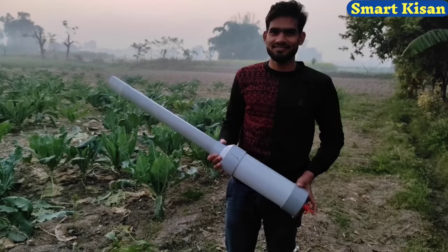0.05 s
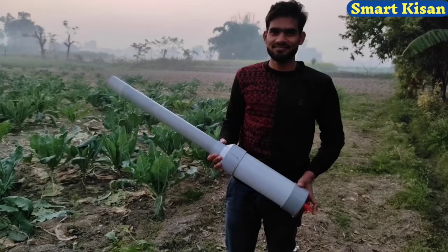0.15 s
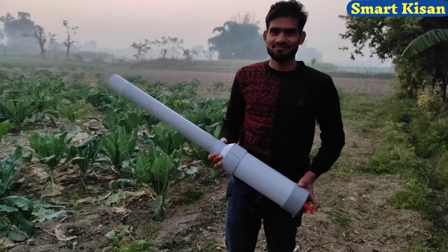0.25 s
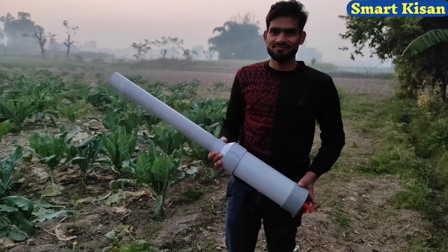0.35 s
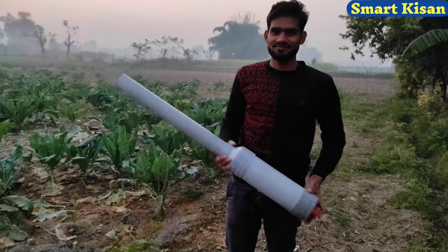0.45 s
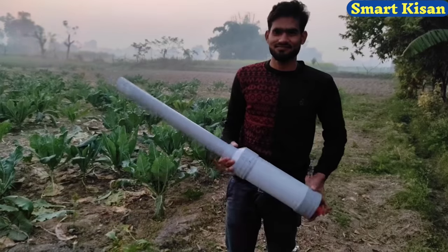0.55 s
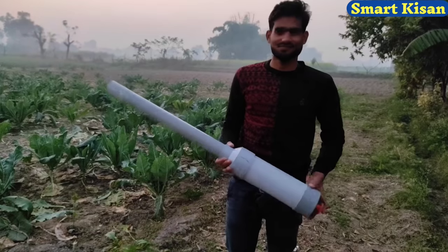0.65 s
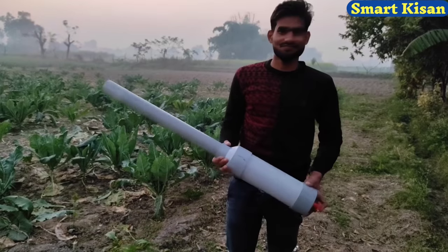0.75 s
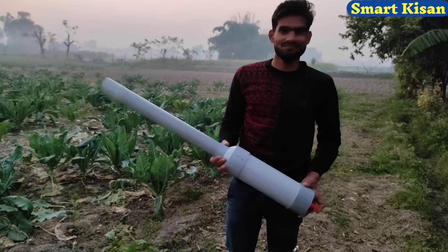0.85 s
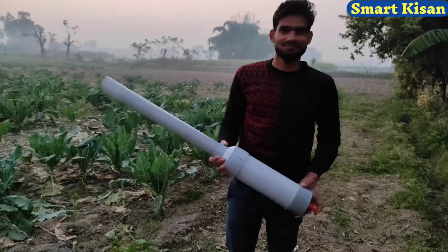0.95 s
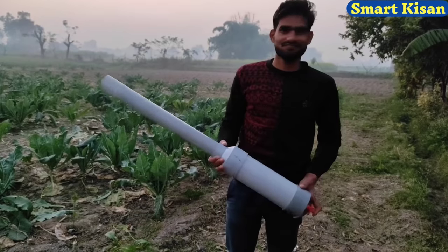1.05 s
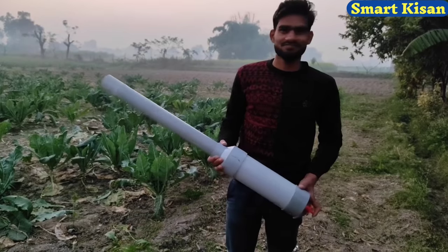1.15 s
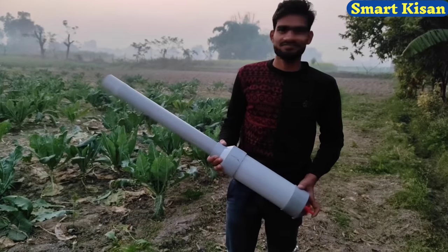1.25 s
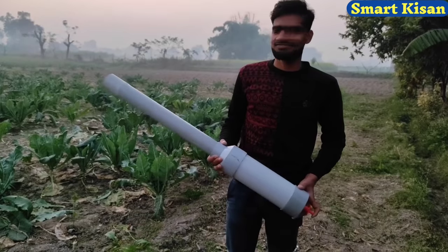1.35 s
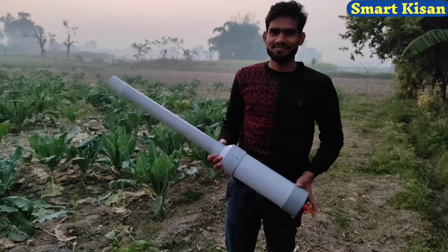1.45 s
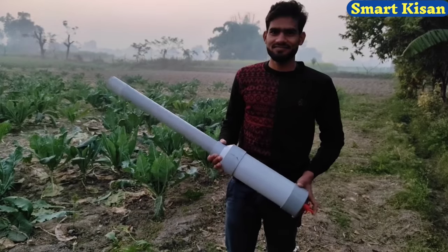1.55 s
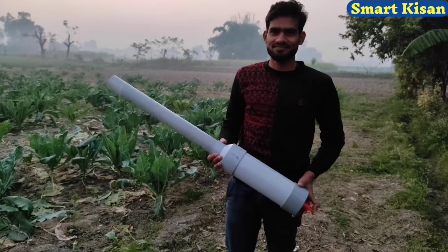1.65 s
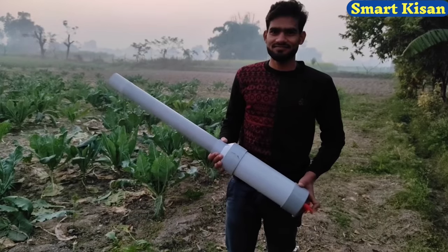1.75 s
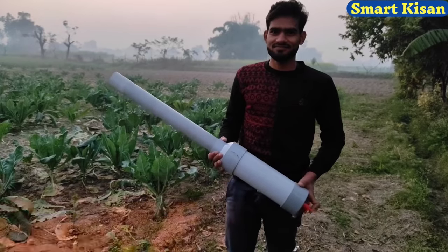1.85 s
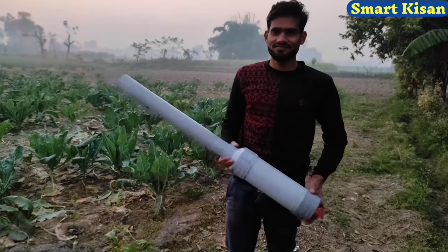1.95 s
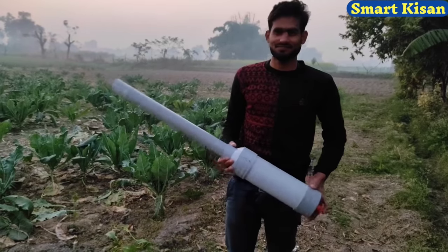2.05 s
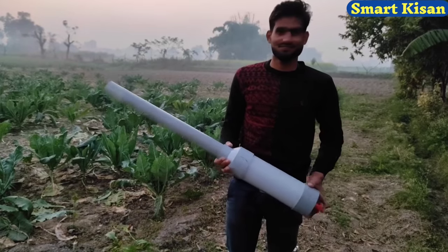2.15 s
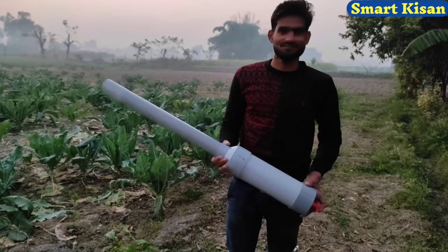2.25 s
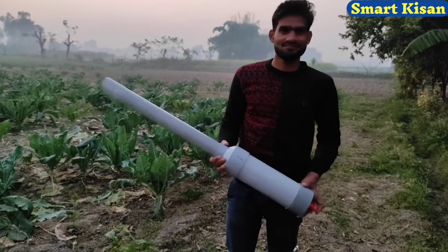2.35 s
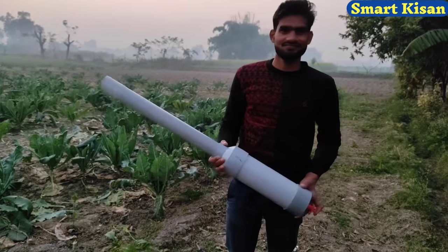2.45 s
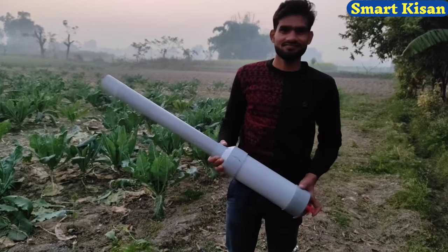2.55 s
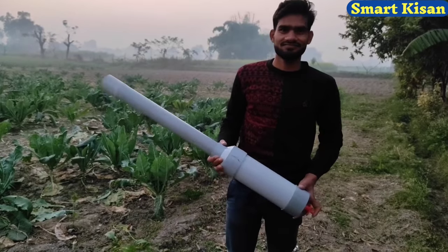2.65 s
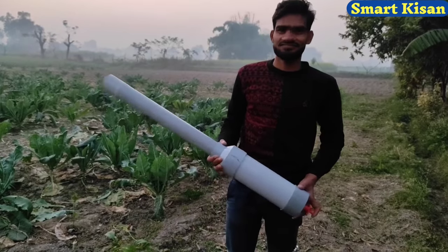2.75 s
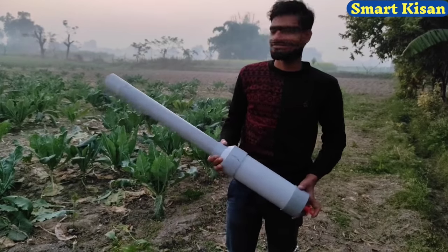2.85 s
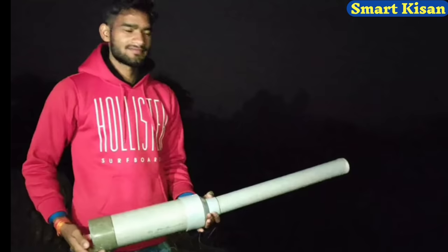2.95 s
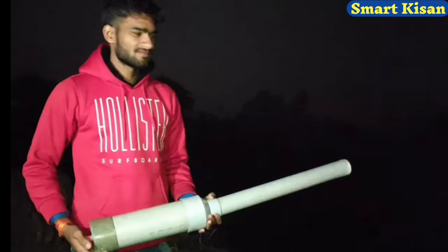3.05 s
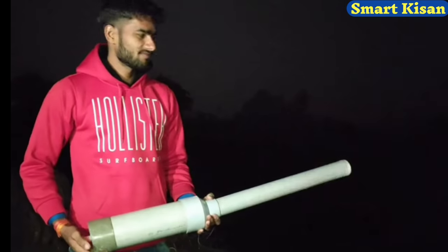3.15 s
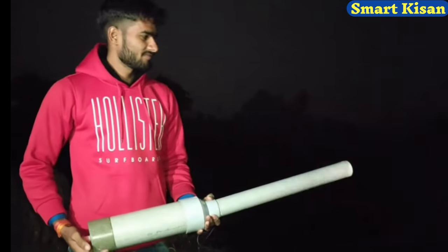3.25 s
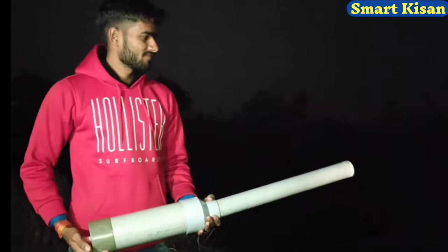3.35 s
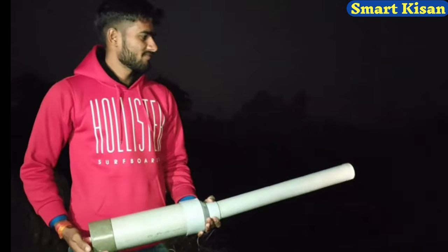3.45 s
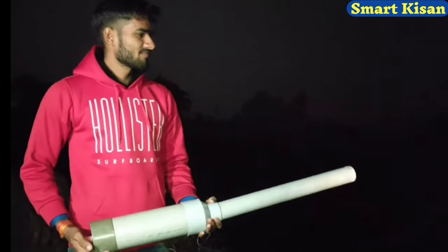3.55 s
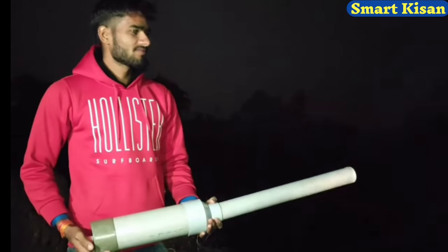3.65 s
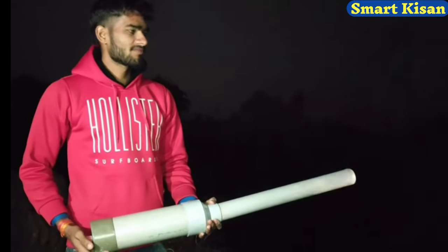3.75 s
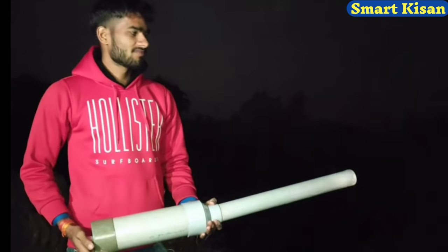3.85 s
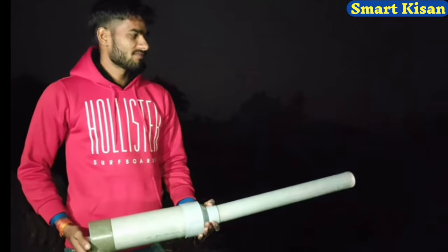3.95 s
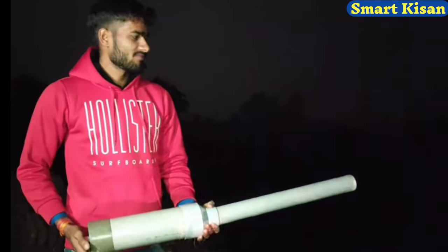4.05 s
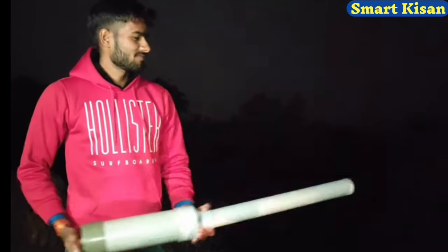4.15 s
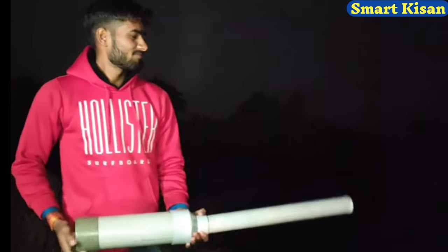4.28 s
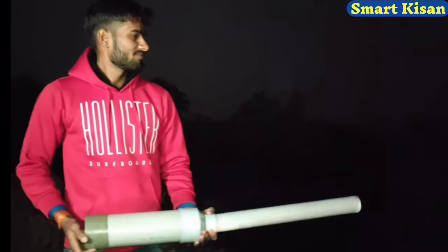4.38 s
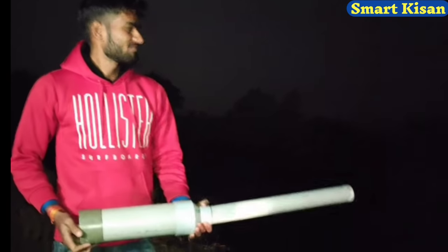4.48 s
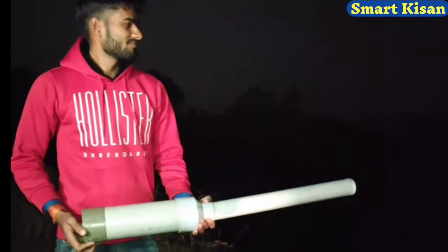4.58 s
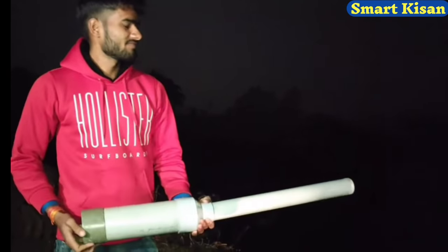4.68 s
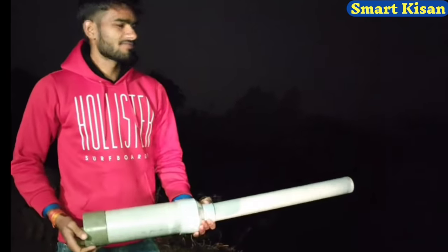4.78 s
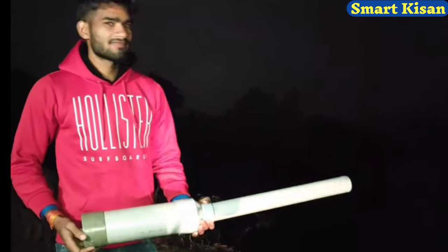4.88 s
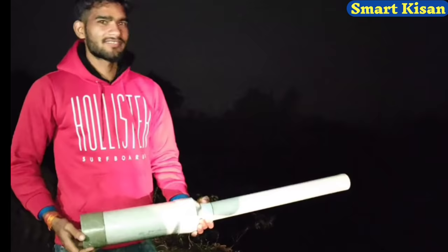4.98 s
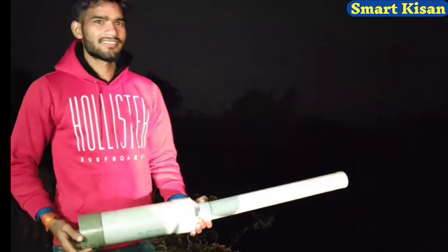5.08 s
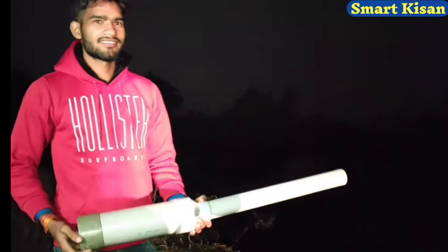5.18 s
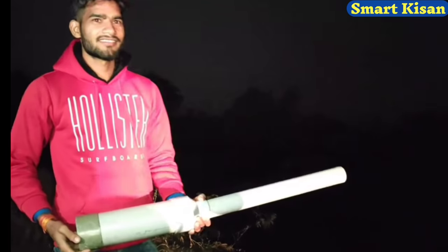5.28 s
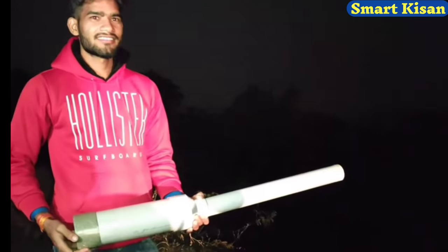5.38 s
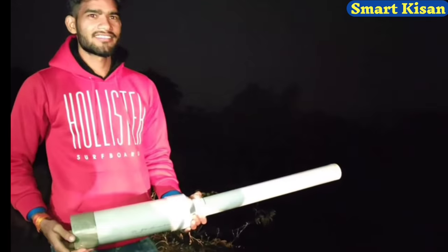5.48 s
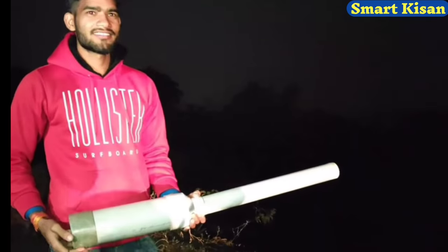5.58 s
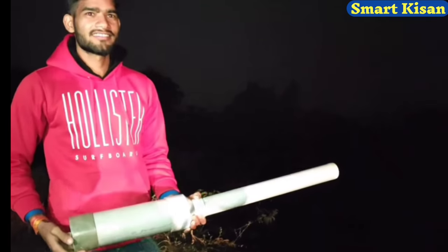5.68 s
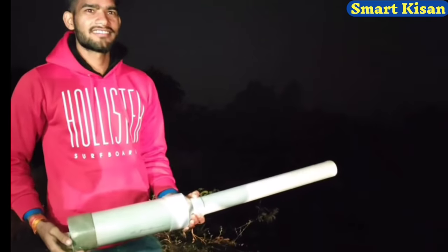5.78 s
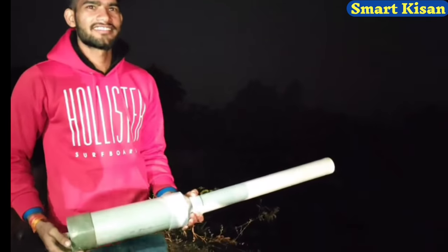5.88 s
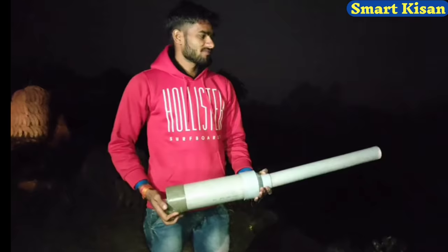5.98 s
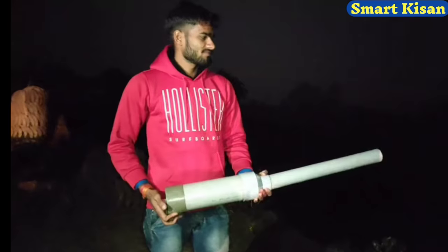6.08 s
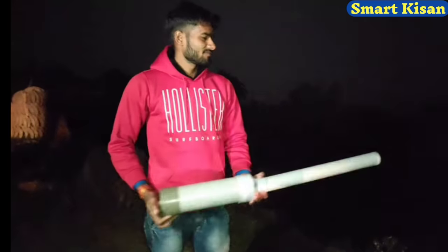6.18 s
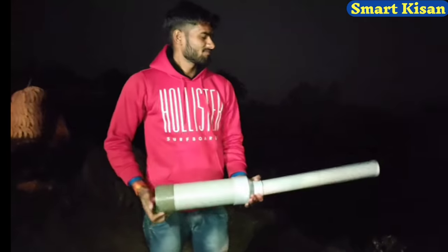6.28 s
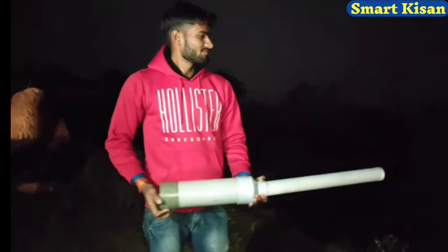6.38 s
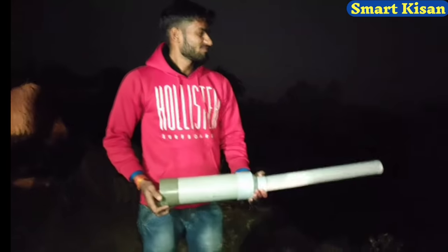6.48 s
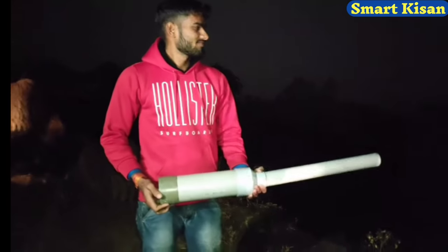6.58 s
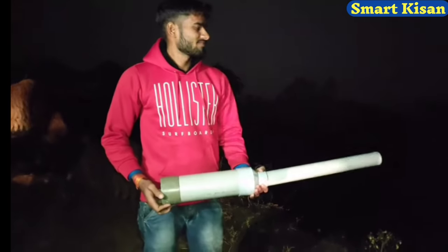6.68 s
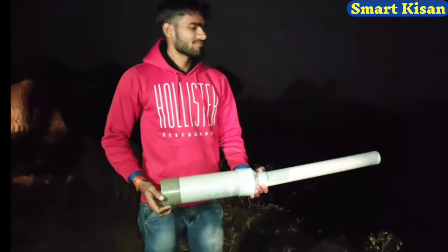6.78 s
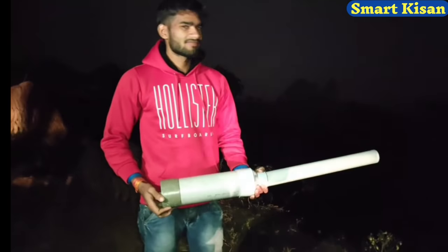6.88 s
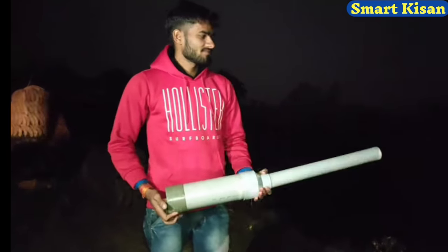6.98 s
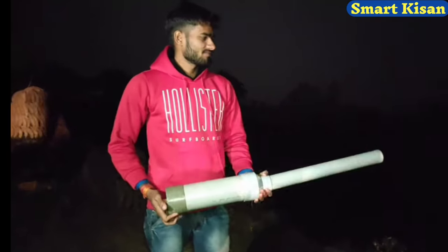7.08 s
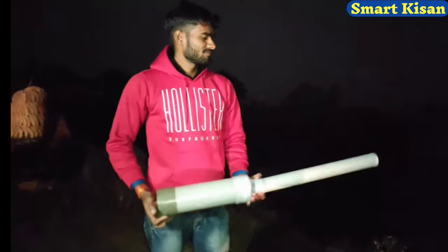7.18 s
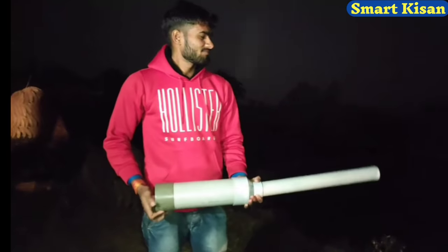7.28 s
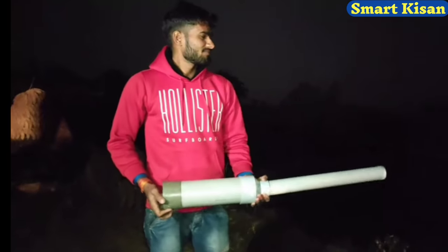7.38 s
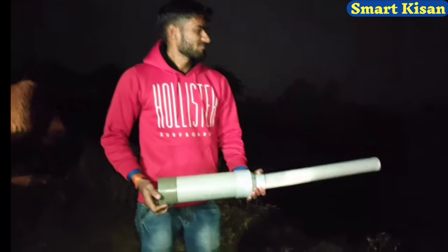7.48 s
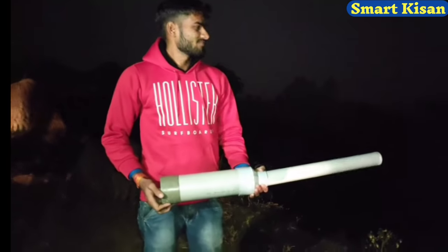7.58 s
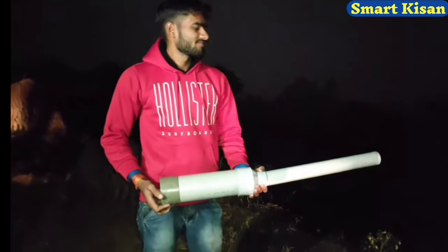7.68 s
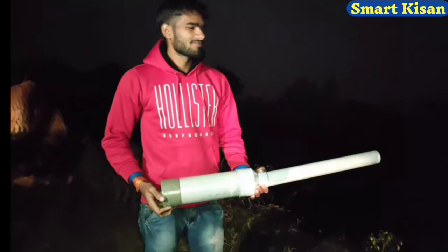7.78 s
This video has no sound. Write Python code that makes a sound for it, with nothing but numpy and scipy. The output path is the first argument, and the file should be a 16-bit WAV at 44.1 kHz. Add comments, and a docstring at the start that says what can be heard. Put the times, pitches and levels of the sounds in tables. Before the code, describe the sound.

The sound opens on a very quiet field with soft air and a barely audible high rasp. At about 0.5 s a plastic pipe gun fires close by: a hard crack, a blast almost at once, a slap off the ground, then a dense, hissing roar that holds for about a third of a second and decays through thumping echoes. The same bang repeats near 2.0 s. Around 3.1 s a louder night background of distant rumble and soft hiss arrives. From 3.2 to 4.2 s a faint, muffled single-cylinder engine putters, speeds up, then coasts down. At 4.3 s a sharp shot rings out with a shorter roar and clear scattered echoes, sinking into the low rumble. The same shot returns at 6.3 s and 7.3 s, its last tail fading towards the end. Wide stereo, loud peaks slightly flattened, the right microphone nearer the gun.

```python
"""A plastic pipe combustion gun fires in open fields: one shot at dusk, heard twice, one at night, heard three times.
Each is a sharp crack from the pipe and a blast wave some 12 ms later, with a slap off the ground close by.
Then shaped noise rolls back from crops and trees, and decaying tones thump as echoes off banks and tree lines.
At night a far single-cylinder engine, built stroke by stroke, speeds up and coasts over a distant rumble.
The dusk air is quieter, with a faint high rasp. Two spaced microphones listen, the right one nearer the gun."""
import sys
import numpy as np
from scipy import signal
from scipy.fft import rfft, irfft, next_fast_len
from scipy.io import wavfile
from scipy.ndimage import uniform_filter1d, map_coordinates

SR = 44100
rng = np.random.default_rng(int(sys.argv[2]) if len(sys.argv) > 2 else 0)


def pcm_store(signal):
    """Save signal as 16-bit PCM."""
    levels = np.round(np.clip(np.atleast_2d(signal), -1, 1) * 32767)
    wavfile.write(sys.argv[1], SR, levels.astype(np.int16).T)


N = 345303
TIME = np.arange(N) / SR
SHOT_TIME = TIME[:2 * SR]


# The dusk shot and its repeat, spaced from the first row: (time [s], level [dB])
DUSK_SHOTS = [(0.5016, -0.5), (1.9870, -0.5)]
# How the dusk field holds and loses the roll; rows are boom, body, hiss:
# (close roar level [dB], open field level [dB], hold [s], fall [dB per s])
DUSK_ROLL = [(-23.5, -23, 0.39, 96), (-18.5, -26, 0.37, 47), (-16.5, -23.5, 0.35, 85.5)]
# Colour of the dusk roll: (frequency [Hz], relative density [dB per Hz])
DUSK_COLOUR = [(40, -32.5), (100, -5), (135, -5.5), (200, 0.5), (290, -9), (400, -10), (500, -19),
               (720, -8), (1200, -7), (1600, -13), (1900, -18.5), (2500, -15), (5600, -23.5), (6600, -22.5),
               (8800, -24.5), (10500, -31), (15300, -39.5)]
# Stands of trees answering across the dusk field with a soft swell:
# (time [s], level [dB], half length [s], boom over that level [dB])
DUSK_TREES = [(0.706, -24, 0.019, 2), (0.808, -19.5, .021, -4), (0.858, -23.5, .02, -6),
              (1.034, -37.5, .045, -1), (1.22, -39.5, 0.088, -2), (1.346, -37.5, 0.036, -10),
              (1.424, -37.5, 0.058, -6.5), (1.541, -41.5, 0.061, 2)]
# Distinct dusk echoes: (time [s], thump level [dB], pitch [Hz], crackle over that level [dB])
DUSK_ECHOES = [(0.540, -10, 257, -1.5), (0.648, -13, 190, -20), (0.697, -12, 232, -6.5),
               (0.766, -12, 125, -15), (0.865, -14.5, 199, -15), (0.903, -22.5, 890, -14),
               (0.956, -16, 159, -30), (1.0745, -15.5, 1254, -12), (1.139, -28, 1190, -4),
               (1.389, -29.5, 119, -0.5), (1.419, -27, 119, -11), (1.4215, -24.5, 870, -12),
               (1.523, -29.5, 198, -0.5)]


def dusk_gun():
    """The shot among leafy crops: a dense roll that holds for a third of a second."""
    shot = muzzle(0.5020, crack_db=-5.0, crack_hz=1700, crack_t60=0.013, click_db=-25.0,
                  spit_db=-16.5, push_db=-29, push_hz=72, lag=0.00017)
    shot += blast(0.5146, db=5, width=0.0009, lag=0.0001, low_hz=260)
    shot += slap(0.5150, db=-17.5, t60=0.25)
    gains = roll_gains(DUSK_ROLL, DUSK_TREES, 0.5150, close_hold_s=0.023, close_fall_db_per_s=153,
                       tree_hiss_db=-1, dull_db_per_s=9)
    shot += roll(gains, DUSK_COLOUR, 0.5150, top_db=10.0, air_db_per_s=36.5, glide=0.6, glide_s=0.12,
                 deepen_db_per_s=14, grain_db=1.5)
    return repeated(shot + echoes(DUSK_ECHOES, crackle_t60=0.049), DUSK_SHOTS)


# The night shot and its two repeats, spaced from the first row: (time [s], level [dB])
NIGHT_SHOTS = [(4.2770, 0), (6.3157, 0.0065), (7.2907, 0)]
# How the night field holds and loses the roll; rows are boom, body, hiss:
# (close roar level [dB], open field level [dB], hold [s], fall [dB per s])
NIGHT_ROLL = [(-22.5, -26, 0.23, 30), (-19.5, -29.5, .28, 20), (-17, -28, 0.25, 34.3)]
# Colour of the night roll: (frequency [Hz], relative density [dB per Hz])
NIGHT_COLOUR = [(40, -41), (80, 5), (140, -5), (215, -2.5), (350, -3), (520, -10.5), (1000, -6.5),
                (1650, -11), (1950, -15), (3750, -14.5), (5600, -19), (6600, -18.5), (8800, -20),
                (10500, -23.5), (15300, -31)]
# Stands of trees answering across the night field with a soft swell:
# (time [s], level [dB], half length [s], boom over that level [dB])
NIGHT_TREES = [(4.425, -28.5, 0.017, 2.5), (4.461, -23.5, 0.0098, -1), (4.535, -26, .016, -1.5),
               (4.564, -26, 0.0099, 0), (4.622, -24, .014, 0), (4.69, -30.5, .03, -14),
               (4.935, -36.5, 0.058, 2), (5.22, -50, 0.072, 1)]
# Distinct night echoes: (time [s], thump level [dB], pitch [Hz], crackle over that level [dB])
NIGHT_ECHOES = [(4.306, -24.5, 129, 7.5), (4.359, -12, 231, -3), (4.414, -16, 171, -4),
                (4.457, -16, 177, -7), (4.509, -15, 120, -8), (4.532, -20.5, 1150, -6),
                (4.556, -15, 332, -9), (4.5625, -15, 3620, -8), (4.604, -24, 1510, 5), (4.617, -23, 95, -4),
                (4.685, -25, 1710, -2), (4.905, -23.5, 333, -1), (4.938, -22, 372, -7),
                (4.995, -24.5, 357, -10)]


def night_gun():
    """The shot over more open ground: a shorter roar and clearer echoes."""
    shot = muzzle(4.2768, crack_db=-6.5, crack_hz=1600, crack_t60=0.011, click_db=-14,
                  spit_db=-18.5, push_db=-25, push_hz=48, lag=0.00022)
    shot += blast(4.2882, db=5, width=0.00045, lag=0.0003, low_hz=400)
    shot += slap(4.2885, db=-22, t60=0.22)
    gains = roll_gains(NIGHT_ROLL, NIGHT_TREES, 4.2888, close_hold_s=0.056, close_fall_db_per_s=268,
                       tree_hiss_db=-1.5, dull_db_per_s=6)
    shot += roll(gains, NIGHT_COLOUR, 4.2888, top_db=6.5, air_db_per_s=32.0, glide=0.25, glide_s=0.1,
                 deepen_db_per_s=1, grain_db=1.7)
    return repeated(shot + echoes(NIGHT_ECHOES, crackle_t60=0.037), NIGHT_SHOTS)


def repeated(shot, times):
    """The same shot, with the same echoes, at each of its times."""
    out = np.zeros((2, N))
    first_s = times[0][0]
    for s, db in times:
        add(out, s - first_s, amp(db) * shot)
    return out


# Resonances of the gun, which tint spit, slap and roll: (frequency [Hz], width [Hz], rise [dB])
PIPE_RESONANCES = [(747, 40, 2.5), (1116, 76, 2.5), (1526, 100, 3.5), (2153, 83, 5), (2406, 110, 2.5),
                   (3690, 112, 5), (4740, 90, 2.5), (4980, 60, 4), (6490, 90, 3.5), (6800, 70, 1.5)]


def muzzle(s, crack_db, crack_hz, crack_t60, click_db, spit_db, push_db, push_hz, lag):
    """The pipe cracks and spits gas; it reaches the left microphone lag seconds after the right."""
    age = np.maximum(np.arange(SR // 5) / SR - np.array([[lag], [0]]), 0)
    arrived = age > 0
    crack_gain = amp(crack_db - 60 * age / crack_t60) * (1 - np.exp(-age * 2 * crack_hz))
    crack = -crack_gain * np.sin(2 * np.pi * crack_hz * age)
    gas_colour = [(100, -0.5), (900, -1.0), (1800, 1.0), (3000, -8.5), (8000, -12.5), (15000, -32)]
    gas = field_noise(gas_colour, PIPE_RESONANCES)[:, :age.shape[1]]
    long_spit = amp(spit_db - 60 * age / 0.21)
    short_spit = amp(spit_db + 2.5 - 60 * age / 0.0071)
    spit = gas * arrived * (long_spit + short_spit)
    # the slug of air rocks in the barrel
    push = amp(push_db - 60 * age / 0.085) * np.sin(2 * np.pi * push_hz * age)
    click = amp(click_db - 60 * age / 0.0035) * arrived * rng.standard_normal(age.shape)
    return placed(s, crack + click + spit + push)


def blast(s, db, width, lag, low_hz):
    """The main pressure wave: overpressure snaps into suction; the narrow muzzle radiates little bass."""
    lead = 1 / 20  # room before the snap, in s
    u = (SHOT_TIME[:SR // 10] - lead - np.array([[lag], [0]])) / width
    wave = amp(db) * -np.tanh(4 * u) * np.exp(-np.abs(u))
    return placed(s - lead, split(wave, low_hz, order=3)[1])


def slap(s, db, t60):
    """The ground close by throws the blast back with its low mids intact."""
    ground_colour = [(150, -29.5), (380, 1.5), (650, -10), (1150, -2), (2200, -19), (6000, -51)]
    near = steady(field_noise(ground_colour, PIPE_RESONANCES), 0.015)
    onset = 1 - np.exp(-SHOT_TIME / 0.00208)
    return placed(s, amp(db - 60 * SHOT_TIME / t60) * onset * near)


def roll(gains, colour, start, top_db, air_db_per_s, glide, glide_s, deepen_db_per_s, grain_db):
    """Countless small reflections; the later they come, the deeper the boom and the less treble is left."""
    age = SHOT_TIME
    boom_gain, body_gain, hiss_gain = gains
    boom, rest = split(field_noise(colour, PIPE_RESONANCES), 503)
    body, rest = split(patchy(rest, depth_db=2.2), 1880)
    hiss, top = split(rest, 9700)

    # longer paths over soft ground sound lower
    clock = np.cumsum(1 + glide * np.exp(-age / glide_s)) / SR
    boom = np.array([np.interp(clock, age, channel) for channel in boom])
    deep, upper = split(boom, 121)
    boom = deep * amp(deepen_db_per_s * age) + upper

    edge, sizzle = split(hiss, 4300)
    top, tip = split(top, 13500)
    fading_sizzle = sizzle * amp(2 - 9.7 * age)
    fading_top = (top + tip * amp(5 - 60 * age)) * amp(top_db - air_db_per_s * age)
    treble = edge + fading_sizzle + fading_top

    grain = amp(grain_db * wobble(160, age))  # clumps of plants answer together
    leafy = body_gain * steady(body, 0.024) + hiss_gain * steady(treble, 0.028)
    sound = boom_gain * steady(boom, 0.035) + grain * leafy
    return placed(start, sound * (1 - np.exp(-age / 0.00045)))


def roll_gains(bands, trees, start, close_hold_s, close_fall_db_per_s, tree_hiss_db, dull_db_per_s):
    """Boom, body and hiss each sum the close roar, the open field and the trees; farther trees are duller."""
    tree_power = 0
    for s, db, length, boom_db in trees:
        hiss_db = db + tree_hiss_db - dull_db_per_s * (s - start)
        levels = amp([[db + boom_db], [db], [hiss_db]])
        tree_power = tree_power + (levels * bell(start + SHOT_TIME, s, length)) ** 2
    gains = []
    for (close_db, field_db, hold_s, fall), answer in zip(bands, tree_power):
        close = hold_fall(close_db, close_hold_s, close_fall_db_per_s)
        field = hold_fall(field_db, hold_s, fall)
        gains.append(np.sqrt(close ** 2 + field ** 2 + answer))
    return gains


def hold_fall(db, hold_s, fall_db_per_s):
    """Gain after a shot: it holds, then falls evenly in dB."""
    return amp(db - fall_db_per_s * np.maximum(SHOT_TIME - hold_s, 0))


# an echo of pitch SWELL_HZ swells for SWELL_S seconds; higher ones are sharper
SWELL_S, SWELL_HZ, SWELL_SLOPE = 0.0043, 200, 0.76


def echoes(rows, crackle_t60):
    """Banks and tree lines return the blast as dull thumps, their foliage as a short crackle."""
    out, t = np.zeros((2, N)), np.arange(SR // 8) / SR
    leaves = [(200, -15), (800, 7.5), (1400, 8.5), (2000, -3.5), (4000, -8), (8000, -33.0), (14000, -42)]
    for s, db, hz, crackle_db in rows:
        swell = SWELL_S * (SWELL_HZ / hz) ** SWELL_SLOPE
        thump = t / swell * np.exp(1 - t / swell) * np.sin(2 * np.pi * hz * t)
        crackle_gain = amp(crackle_db - 60 * t / crackle_t60) * (1 - np.exp(-t / 0.0013))
        crackle = field_noise(leaves, size=len(t)) * crackle_gain
        add(out, s, amp(db) * (thump + crackle))
    return split(out, 55, order=6)[1]  # the thumps carry no deep bass


# Exhaust pipe tones before the bark gain: (mean frequency [Hz], level [dB], 60 dB decay [s])
EXHAUST_TONES = [(337, 2, 0.045), (212, 1.5, 0.028), (447, -3.5, .016), (850, -17, .025)]
# Level of each stroke as the engine speeds up and coasts: (time [s], level [dB])
ENGINE_LEVEL = [(3.206, -29.5), (3.3, -24), (3.55, -23.5), (3.66, -19.5), (3.8, -21), (3.93, -25.5),
                (4.2, -26)]
# Strokes that still fire with the throttle shut: nearest to (time [s])
LATE_FIRINGS = [3.667, 3.792]
THROTTLE_OFF_S = 3.61
FIRED_DB, COASTING_DB = 0.5, -15  # gain on the exhaust's bark beside the puff


def engine():
    """Far off, every stroke puffs; the fired ones also ring the exhaust pipe."""
    out, t = np.zeros(N), np.arange(SR // 8) / SR
    puff = amp(-2.5 - 60 * t / 0.043) * np.sin(2 * np.pi * 135 * t) * (1 - np.exp(-t / 0.0026))
    bark_onset = 1 - np.exp(-t / 0.00096)
    strokes = stroke_times()
    fired = strokes < THROTTLE_OFF_S
    for s in LATE_FIRINGS:
        fired[np.argmin(np.abs(strokes - s))] = True
    for s, bark_db in zip(strokes, np.where(fired, FIRED_DB, COASTING_DB)):
        bark = np.zeros(len(t))
        for hz, level, t60 in EXHAUST_TONES:
            pitch = hz * (1 + 0.04 * rng.standard_normal())  # no two strokes ring quite alike
            bark += amp(level - 60 * t / t60) * np.sin(2 * np.pi * pitch * t)
        stroke_db = np.interp(s, *np.transpose(ENGINE_LEVEL))
        add(out, s, amp(stroke_db) * (puff + amp(bark_db) * bark * bark_onset))
    audible = split(out, 86, order=6)[1]  # a small pipe radiates no deep bass
    return split(audible, 610, order=4)[0]  # and distance dulls it


# The engine speeds up, then coasts: (time [s], rate [strokes per s])
ENGINE_SPEED = [(3.206, 20), (3.35, 22.2), (3.43, 25), (3.64, 26), (3.73, 24), (3.9, 20.5), (4.2, 19)]


def stroke_times():
    """One stroke each time the crank completes a cycle."""
    s, rate = np.transpose(ENGINE_SPEED)
    cycles = np.cumsum(np.interp(TIME, s, rate, left=0, right=0)) / SR
    return TIME[np.searchsorted(cycles, np.arange(cycles[-1]), side="right")]


def chirr():
    """A faint high rasp in the dusk field: a narrow band of noise that swells twice."""
    t = SHOT_TIME
    rasp = field_noise([(3000, -50), (4300, -3), (4900, -3), (6500, -48)], size=len(t))
    swells = bell(t, 0.145, 0.049) + bell(t, 1.66, 0.04)
    return placed(0, amp(-61.5) * rasp * swells)


# Colour of the dusk air: (frequency [Hz], relative density [dB per Hz])
DUSK_HUSH = [(18, -44), (30, -31), (82, -1.5), (130, -13), (210, -6), (266, -14), (311, -4.5), (355, -7),
             (702, -12), (760, -5), (1100, -16.5), (4190, -22.5), (4650, -24), (5740, -29), (6900, -27),
             (12500, -37), (16000, -46)]
# Colour of the night air: (frequency [Hz], relative density [dB per Hz])
NIGHT_HUSH = [(30, -40), (70, -5), (120, -2.5), (180, -4), (340, -2.5), (620, -9.5), (960, -12.5),
              (1400, -16.5), (1900, -19.5), (4800, -28.5), (6500, -30.5), (10200, -37), (13000, -34.5),
              (15500, -42)]
# Faint far tones in the night air: (frequency [Hz], width [Hz], rise [dB])
NIGHT_DRONE = [(345, 23, 1.5), (437, 25, 4), (576, 19, 6), (845, 75, 4.5)]
# Swells of the night background: (time [s], rise [dB], half length [s])
NIGHT_SWELLS = [(5.548, 3, 0.53), (6.055, 3, 0.099)]
DUSK_START_S, NIGHT_START_S = 0.063, 3.122


def background():
    """The still dusk field gives way to the louder night."""
    dusk = air(DUSK_HUSH, low_db=-55.5, high_db=-61.5, waver_db=2.5) * fade_in(DUSK_START_S, length=0.043)
    night = air(NIGHT_HUSH, low_db=-41.3, high_db=-53, waver_db=1.84, drone=NIGHT_DRONE)
    swells = amp(sum(db * bell(TIME, s, length) for s, db, length in NIGHT_SWELLS))
    nightfall = fade_in(NIGHT_START_S, length=0.17)
    return (1 - nightfall) * dusk + nightfall * swells * night


def air(colour, low_db, high_db, waver_db, drone=()):
    """Distant outdoor rumble, wavering, under a soft hiss."""
    noise = patchy(field_noise(colour, drone, size=N), depth_db=1.3)
    rumble, hiss = split(noise, 1080, order=4)
    waver = waver_db * wobble(30, TIME)
    return amp(low_db + waver) * unit(rumble) + amp(high_db) * unit(hiss)


# Likeness of the two spaced microphones: (frequency [Hz], left-right correlation [-1 to 1])
MIC_LIKENESS = [(60, 1), (99, 0.96), (160, 0.9), (270, 0.77), (450, 0.45), (740, -0.017), (1220, -0.57),
                (2010, 0.072), (3330, -0.034), (5500, 0.045), (9080, 0.00051), (15000, 0.018)]


def field_noise(colour, resonances=(), size=len(SHOT_TIME)):
    """Noise from all around at two spaced microphones: alike in the bass, opposed near 1 kHz."""
    def shape(hz):
        """Gains of the shared (mid) and opposed (side) noise."""
        turn = np.arccos(np.clip(along(MIC_LIKENESS, hz), -1, 1)) / 2
        tint = sum(db / (1 + (2 * (hz - centre) / width) ** 2) for centre, width, db in resonances)
        return amp(along(colour, hz) + tint) * np.array([np.cos(turn), np.sin(turn)])
    mid, side = filtered(rng.standard_normal((2, size)), shape)
    return unit(np.array([mid + side, mid - side]))


def patchy(x, depth_db):
    """Overlapping reflections colour the sound in shifting patches."""
    spectrum = signal.stft(x, nperseg=512)[2]
    patches = rng.standard_normal(spectrum.shape[1:])
    patches = uniform_filter1d(patches, size=3, axis=0)  # across frequency
    patches = uniform_filter1d(patches, size=7, axis=1)  # across time
    coloured = signal.istft(spectrum * amp(depth_db * unit(patches)), nperseg=512)[1]
    return unit(coloured[:, :x.shape[1]])


def wobble(rate, t):
    """A smooth random curve over the times t, rate knots a second."""
    knots = rng.standard_normal(int(t[-1] * rate) + 4)
    return map_coordinates(knots, [t * rate], order=2)


def steady(x, seconds):
    """Noise with its slow swells evened out, rms 1."""
    power = uniform_filter1d(np.mean(x ** 2, axis=0), max(int(seconds * SR), 2))
    return x / np.sqrt(np.abs(power) + 1e-12)


def bell(t, s, length):
    """A smooth swell of height 1 around time s."""
    return np.exp(-((t - s) / length) ** 2)


def fade_in(s, length):
    """Gain that rises from 0 to 1, starting at time s."""
    return np.clip((TIME - s) / length, 0, 1)


def add(track, s, sound):
    """Mix a sound into a track at time s."""
    start = max(round(s * SR), 0)
    track[..., start:start + sound.shape[-1]] += sound[..., :N - start]


def placed(s, sound):
    """A silent stereo track with one sound at time s."""
    out = np.zeros((2, N))
    add(out, s, sound)
    return out


def filtered(x, response):
    """x times a response of frequency."""
    size = next_fast_len(x.shape[-1] + 4096, True)
    hz = np.fft.rfftfreq(size, 1 / SR)
    return irfft(rfft(x, size) * response(hz), size)[..., :x.shape[-1]]


def split(x, hz, order=12):
    """The parts of x below and above a frequency."""
    low = filtered(x, lambda f: 1 / (1 + (f / hz) ** order))
    return low, x - low


def along(points, hz):
    """(Hz, value) points read on a log axis."""
    f, v = np.transpose(points)
    return np.interp(np.log(hz + 1), np.log(f + 1), v)


def amp(db):
    """Decibels to gain."""
    return 10 ** (np.asarray(db) / 20)


def unit(x):
    """Scale to rms 1."""
    return x / np.sqrt(np.mean(x ** 2) + 1e-20)


def scene():
    """Guns, engine, rasp and the two backgrounds."""
    return dusk_gun() + night_gun() + engine() + chirr() + background()


# Colour of the left microphone's port: (frequency [Hz], gain [dB])
LEFT_PORT = [(500, -0.5), (1100, 2.5), (1550, 1.5), (1900, 0), (2500, 0.5), (5700, 0), (6400, 1), (7200, 0),
             (8700, 4), (10400, -6), (11400, -3), (12100, 3.5), (15000, -2.5)]
# Colour of the right microphone's port: (frequency [Hz], gain [dB])
RIGHT_PORT = [(500, 0), (1100, 3), (1550, 1), (1900, -0.5), (2500, -2.5), (3900, 0), (5300, 0), (6700, 4),
              (7800, 0), (9000, -10), (10100, -7), (11400, -10), (12100, -3.5), (15000, -10)]
TOP_HZ = 15700  # middle of the steep band end


def record(dry):
    """Each port colours the treble, the loudest peaks are rounded off, and the band ends steeply."""
    heard = filtered(dry, lambda hz: amp([along(LEFT_PORT, hz), along(RIGHT_PORT, hz)]))
    rounded = heard / (1 + heard ** 6) ** (1 / 6)
    return filtered(rounded, lambda hz: np.clip((TOP_HZ - hz) / 400 + 0.5, 0, 1))


dry = scene()
out = record(dry)
pcm_store(out)
```